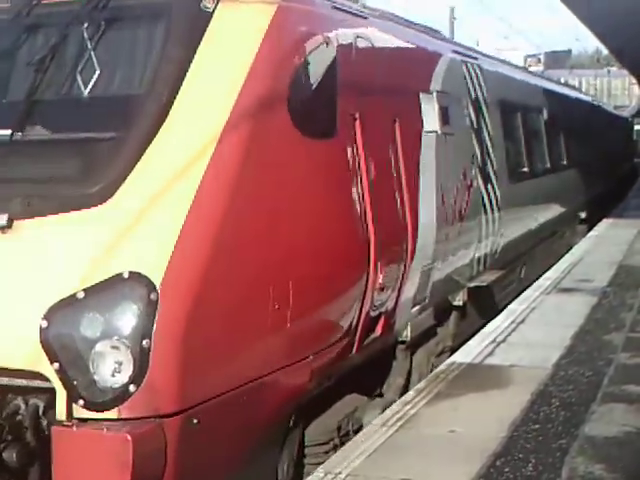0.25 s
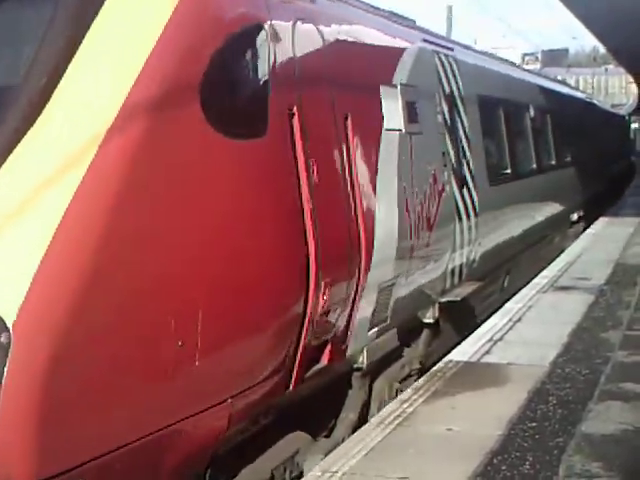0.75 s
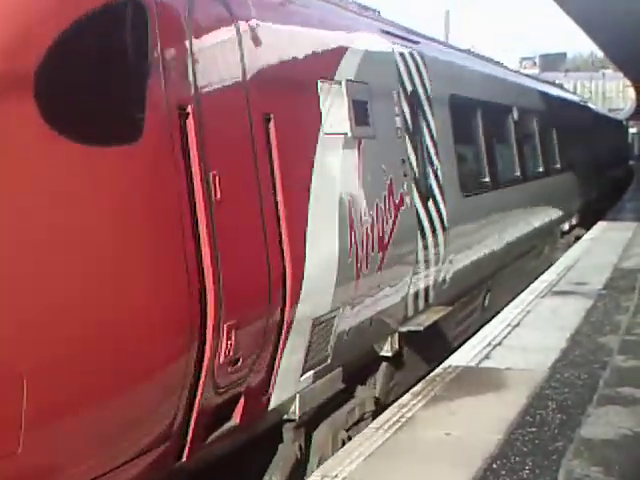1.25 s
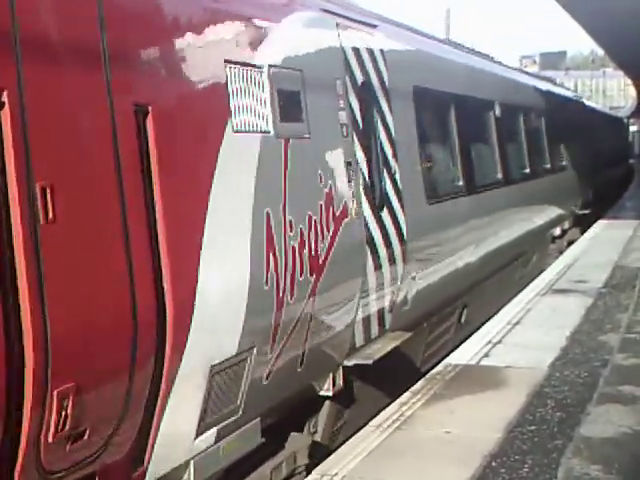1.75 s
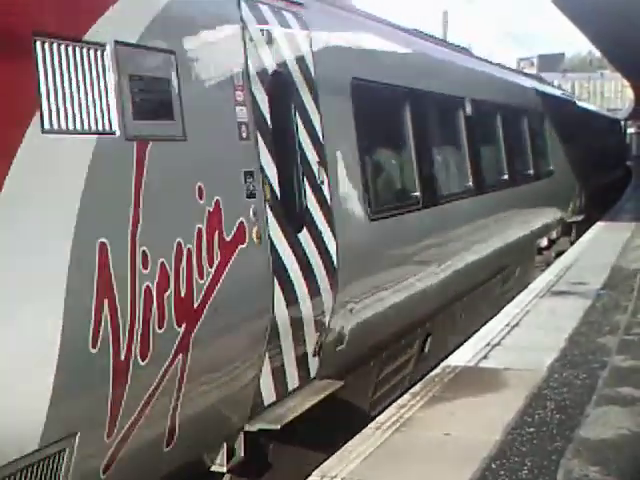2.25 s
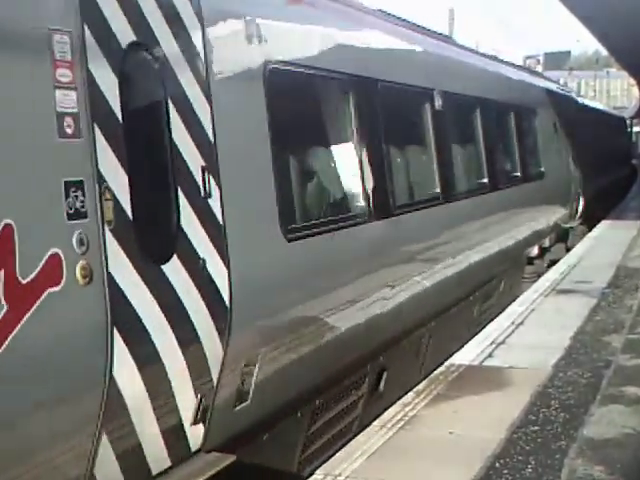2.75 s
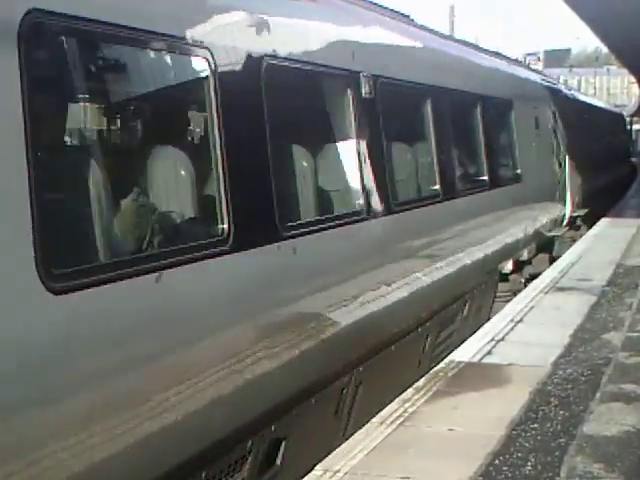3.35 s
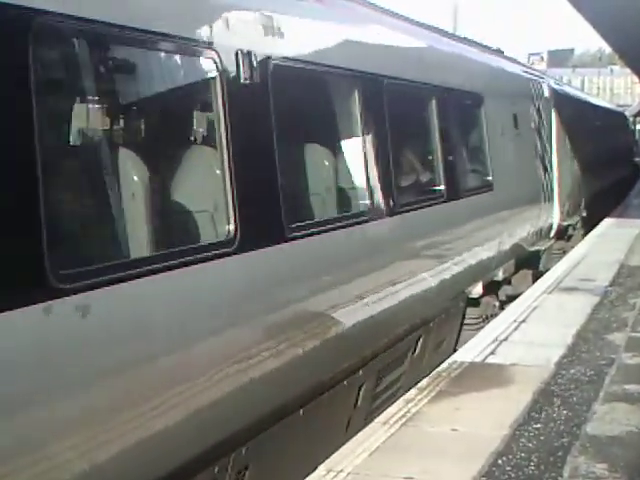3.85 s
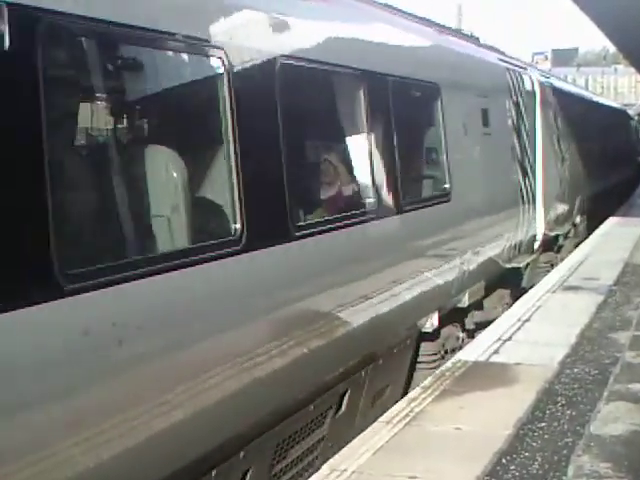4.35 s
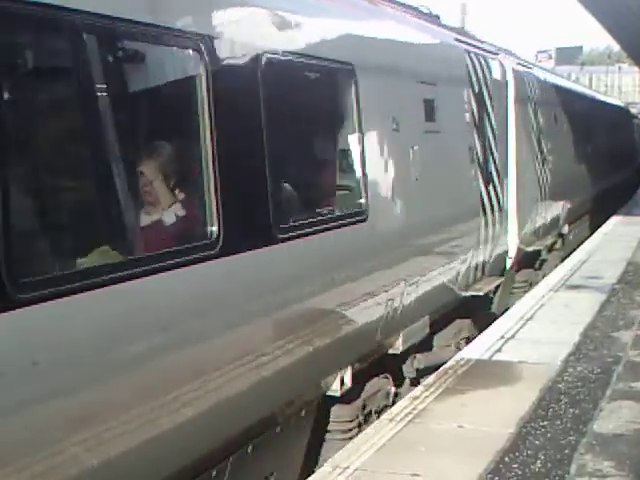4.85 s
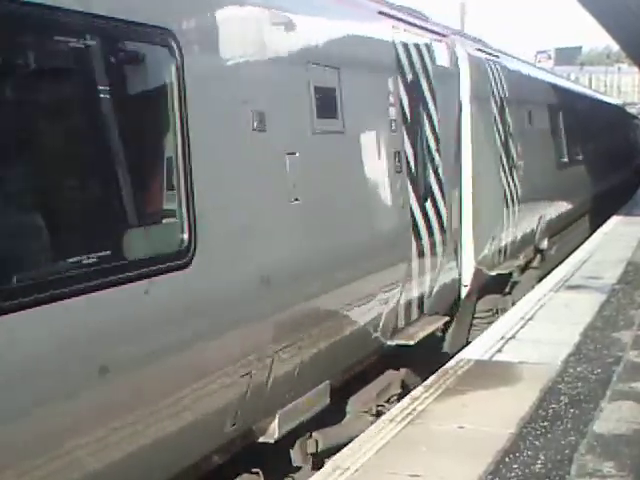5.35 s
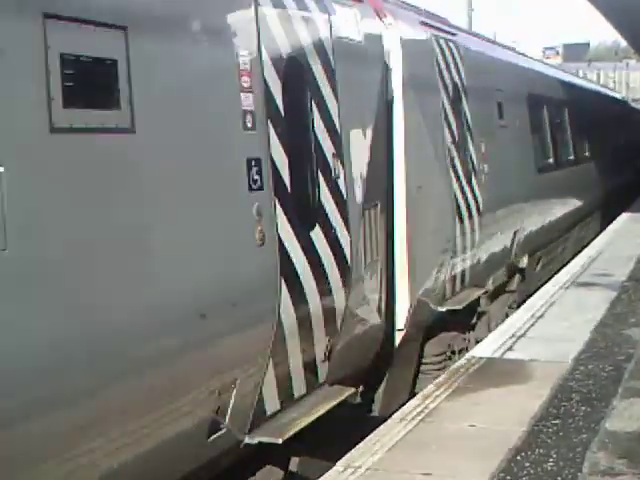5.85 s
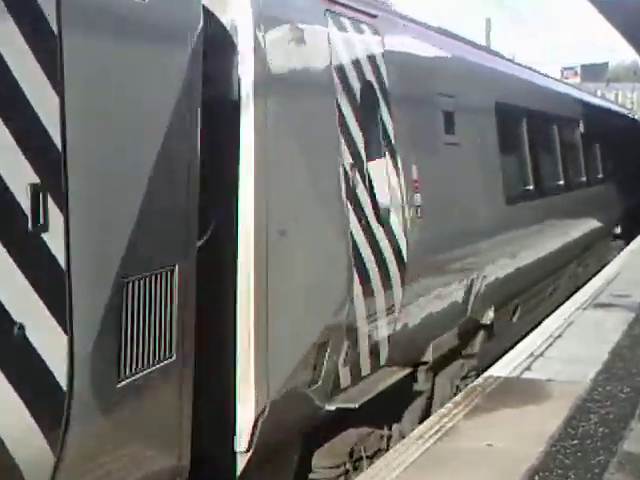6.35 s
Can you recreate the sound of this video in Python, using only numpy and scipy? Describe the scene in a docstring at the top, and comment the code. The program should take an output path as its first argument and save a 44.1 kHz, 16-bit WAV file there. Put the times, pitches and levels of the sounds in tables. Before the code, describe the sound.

A diesel train gathers speed past a small microphone on a station platform. From 0 s a low, steady drone throbs with rapid firing pulses, backed by soft rumble and muffled clatter; its pitch climbs smoothly by about a quarter over the whole stretch. From about 2 s the drone's tones beat and waver, and around 2.5 s and 3.5 s faint airy hisses and thin high singing slip by. Near 4.3 s clatter, gas noise and fan air swell. Between 4.8 and 5.5 s one engine passes very close: a throaty, pulsing roar with a hollow ring, heavy wheel rumble, a strong rush of air and a fuzzy, rising turbo whistle. A short gear whine surfaces around 6 s as the roar and hiss fall away. The drone remains full and buzzing, slightly higher, until an abrupt end at about 6.6 s.

```python
"""A droning diesel train gathers speed along a platform; after five seconds one engine passes close by.
The drone is a sum of crank orders lifted by pipe resonances, with pulsed gas noise; the clatter and
the low rumble are filtered noise. The close engine adds a pulsing roar, bay ring and gear tones;
filtered noise gives the cooling air, narrow noise the singing ducts and a climbing turbo whistle.
All firing and gear sounds follow one crank; sources going by swell and fade as 1 / distance."""
import sys
import numpy as np
from scipy import signal
from scipy.fft import rfft, irfft, next_fast_len
from scipy.io import wavfile

SR = 44100
rng = np.random.default_rng(int(sys.argv[2]) if len(sys.argv) > 2 else 0)


def store_wav(level_fs):
    """Save 16-bit WAV to argv[1]."""
    pcm = np.round(np.clip(np.atleast_2d(level_fs), -1, 1) * 32767)
    wavfile.write(sys.argv[1], SR, pcm.T.astype(np.int16))


N = 290619
T = np.arange(N) / SR  # s


def amp(db):
    """Decibels to gain."""
    return 10 ** (np.asarray(db) / 20)


def unit(x):
    """Scales to rms 1."""
    return x / np.sqrt(np.mean(x ** 2) + 1e-20)


def gain_at(colour, hz):
    """Gain of a spectrum at the given frequencies, interpolated in dB over log frequency."""
    f_hz, level_db = np.transpose(colour)
    return amp(np.interp(np.log(hz + 1), np.log(f_hz), level_db))  # + 1 avoids log(0)


def coloured(x, colour):
    """Filters by a spectrum; rms 1."""
    size = next_fast_len(N)
    gain = gain_at(colour, np.fft.rfftfreq(size, 1 / SR))
    return unit(irfft(rfft(x, size) * gain, size)[:N])


def waver(rate_hz):
    """Random signal of rms 1, low-passed by a Gaussian at about the given rate."""
    size = next_fast_len(N)
    lowpass = np.exp(-.5 * (np.fft.rfftfreq(size, 1 / SR) / rate_hz) ** 2)
    return unit(irfft(rfft(rng.standard_normal(size)) * lowpass, size)[:N])


def whistle(hz, width_hz):
    """Narrow noise of rms 1 that follows a pitch."""
    angle_rad = 2 * np.pi * np.cumsum(hz * np.ones(N)) / SR
    return unit(waver(width_hz) * np.cos(angle_rad) + waver(width_hz) * np.sin(angle_rad))


def passing(closest_s, approach_s, leave_s):
    """Gain of a source that goes by: 1 when closest, then falling as 1 / distance."""
    away = (T - closest_s) / np.where(T < closest_s, approach_s, leave_s)
    return 1 / np.sqrt(1 + away ** 2)


def loudness(places, far_db=-np.inf):
    """Gain of a sound from several passing places: powers add to the steady level from the train."""
    power = amp(far_db) ** 2
    for closest_s, level_db, approach_s, leave_s in places:
        power = power + (amp(level_db) * passing(closest_s, approach_s, leave_s)) ** 2
    return np.sqrt(power)


def crank_hz():
    """Crankshaft speed, rising as the train gathers speed."""
    # crank speed: t/s, speed/turns per s
    crank_speed = [(0, 23.07), (.5, 23.75), (2, 25.28), (2.5, 26.02), (3.5, 27.26), (4.5, 28.34),
                   (5.5, 29.02), (6, 29.17), (6.6, 29.52)]
    t_s, turns_per_s = np.transpose(crank_speed)
    return np.interp(T, t_s, turns_per_s)


def crank_turns(wobble_turns=0.0051):
    """Crank angle in turns, slightly unsteady."""
    return np.cumsum(crank_hz()) / SR + wobble_turns * waver(rate_hz=6.5)


def tone(turns, order, start_turns=0):
    """A sine of rms 1 locked to the crank; a four-stroke cycle allows whole and half orders."""
    return np.sqrt(2) * np.cos(2 * np.pi * (order * turns + start_turns))


def side_tones(turns, orders, fading_db):
    """Weak engine orders that come and go with the reflections off the platform."""
    total = 0
    for order, level_db in orders:
        fading = amp(level_db + fading_db * waver(rate_hz=3.1))
        total = total + fading * tone(turns, order, rng.random())
    return total


def knocks(turns, decay, unequal_db, chance_db):
    """A burst at each firing, decay in firing intervals; the cylinders differ, and so does each stroke."""
    cylinders = 6
    firings = (turns - turns.min()) * cylinders / 2  # each cylinder fires every two turns
    stroke = firings.astype(int)
    cylinder_db = unequal_db * unit(rng.standard_normal(cylinders))
    stroke_db = chance_db * rng.standard_normal(N)
    strength = amp(cylinder_db[stroke % cylinders] + stroke_db[stroke])
    return unit(strength * np.exp(-(firings % 1) / decay))


def cyclic_noise(turns, repeating):
    """Noise of which a share (of power, 0-1) repeats with every two turns of the crank."""
    cycle = rng.standard_normal(3072)
    locked = np.interp(turns / 2 % 1, np.linspace(0, 1, len(cycle)), cycle)
    return np.sqrt(repeating) * locked + np.sqrt(1 - repeating) * rng.standard_normal(N)


def rumble():
    """Low noise of rolling wheels and the shaking underframe."""
    # spectrum: f/Hz, relative level/dB
    rumble_colour = [(10, 13.5), (25, -10.5), (38, 5.5), (50, 15.5), (64, 11), (100, 6.5), (170, 9),
                     (400, -42.5)]
    # wheels going by: closest/s, level/dB, approach/s, leaving/s
    wheel_pass = [(5.15, -27.5, 0.23, 0.58)]
    return loudness(wheel_pass, far_db=-39) * coloured(rng.standard_normal(N), rumble_colour)


def clatter(turns, pulsing=0.087):
    """Combustion and injector noise from along the train, ringing in the engine casings."""
    # casing spectrum: f/Hz, relative level/dB
    clatter_colour = [(200, -1.5), (540, -4.5), (850, 6), (1080, 1), (1250, -9), (1480, -1.5), (1620, 3.5),
                      (1740, 3.5), (1840, -6.5), (2350, -16), (2800, -10), (3300, -19), (3900, -41.5),
                      (9500, -56)]
    # casings going by: closest/s, level/dB, approach/s, leaving/s
    casing_pass = [(2.35, -50.5, 0.2, .25), (4.3, -42.5, .25, 0.48)]
    beat = 1 - pulsing + pulsing * knocks(turns, decay=0.27, unequal_db=5, chance_db=4.5)
    return loudness(casing_pass, far_db=-46.5) * coloured(beat * rng.standard_normal(N), clatter_colour)


def duct_whistle(hz=5430, width_hz=50, far_db=-78):
    """One duct sings at a steady pitch all along the train."""
    # duct openings going by: closest/s, level/dB, approach/s, leaving/s
    duct_pass = [(2.5, -76.5, 0.12, 0.23), (3.35, -72.5, 0.42, 0.19)]
    return loudness(duct_pass, far_db) * whistle(hz, width_hz)


def cooling_air(rush_db=9, gust_db=0.9):
    """Air rushing through the coolers and grilles (broad noise), and singing in the ducts (narrow)."""
    # rush spectrum: f/Hz, relative level/dB
    air_colour = [(900, -3), (1700, 17), (2100, 18), (2800, 19), (3100, 10.5), (3450, 15), (3800, 2.5),
                  (4300, 9), (4600, 0), (6400, 4), (7400, 3), (8600, 6), (10000, 3), (11800, -19)]
    # singing ducts: f/Hz, width/Hz, level/dB re flow gain
    ducts = [(2740, 28, -1), (5320, 310, -6), (6750, 190, -10)]
    # flow gain of grilles going by: closest/s, level/dB, approach/s, leaving/s
    grille_pass = [(2.5, -71, 0.41, 0.095), (4.35, -63.5, .2, 0.36), (5.16, -58, 0.81, 0.31),
                   (6.57, -71, 0.056, 0.14)]
    flow = loudness(grille_pass, far_db=-82) * amp(gust_db * waver(rate_hz=25))
    rush = amp(rush_db) * coloured(rng.standard_normal(N), air_colour)
    singing = sum(amp(level_db) * whistle(hz, width_hz) for hz, width_hz, level_db in ducts)
    return flow * (rush + singing)


def turbo(start_hz=3980, rise_hz_per_s=424, core_db=-5.5, skirt_db=0):
    """A fuzzy whistle that rises steadily as the turbocharger spools up."""
    # gain before core, skirt and spool factors: closest/s, level/dB, approach/s, leaving/s
    turbo_pass = [(3.55, -67, 0.17, 0.33), (5.22, -56, 0.27, 0.3)]
    hz = start_hz + rise_hz_per_s * T
    core = amp(core_db) * whistle(hz, width_hz=45)
    skirt = amp(skirt_db) * whistle(hz, width_hz=170)
    spooled = (hz / hz[-1]) ** 2  # the faster it spins, the louder it sings
    return spooled * loudness(turbo_pass) * (core + skirt)


def engine_roar(turns, beat, roar_db=-3):
    """The close engine's roar: noise pulsing with the firing, plus weaker crank orders."""
    # roar spectrum: f/Hz, relative level/dB
    roar_colour = [(100, -29), (250, -4), (480, -4), (650, 2.5), (1080, -4), (1350, -10), (1700, -3.5),
                   (2000, -21.5), (2800, -20), (4000, -24.5), (8000, -53)]
    # weaker tones: crank order, level/dB re engine gain
    near_orders = [(1.5, -12), (2, -10), (4, -11), (4.5, -10.5), (6.5, -3), (7.5, -8.5), (11, -11),
                   (13, -12.5)]
    # engine gain: closest/s, level/dB, approach/s, leaving/s
    engine_pass = [(5.2, -34.5, 0.47, .62)]
    roar = amp(roar_db) * coloured(beat * cyclic_noise(turns, repeating=0.43), roar_colour)
    return loudness(engine_pass) * (roar + side_tones(turns, near_orders, fading_db=1))


def bay_ring(turns, beat):
    """Throaty ring of the engine bay: pulsing noise through its resonances."""
    # bay spectrum: f/Hz, relative level/dB
    bay_colour = [(300, -12.5), (370, -2), (440, 12), (490, 6.5), (570, 5.5), (630, -26.5), (900, -23.5),
                  (1080, 3.5), (1300, -33), (2000, -37)]
    # bays going by: closest/s, level/dB, approach/s, leaving/s
    bay_pass = [(3.7, -51.5, 0.35, .2), (5.02, -33, 0.29, 0.3)]
    return loudness(bay_pass) * coloured(beat * cyclic_noise(turns, repeating=0.56), bay_colour)


def gear_tones():
    """Gears whine at fixed multiples of crank speed."""
    # gears: crank order, level/dB re gear gain
    gears = [(37.5, -6), (42, -3), (56, -8)]
    # gear gain: closest/s, level/dB, approach/s, leaving/s
    gear_pass = [(5.0, -47, 0.069, 0.16), (5.98, -46, .15, 0.19)]
    whine = sum(amp(level_db) * whistle(order * crank_hz(), width_hz=6) for order, level_db in gears)
    return loudness(gear_pass) * whine


def close_engine(turns):
    """The engine under the coach: roar and bay share one firing beat; gears whine on top."""
    beat = .83 + .17 * knocks(turns, decay=1, unequal_db=2, chance_db=.5)
    return engine_roar(turns, beat) + bay_ring(turns, beat) + gear_tones()


def pipe_gain(order):
    """Exhaust resonances: a crank order swells as rising speed carries it through one."""
    # resonances: f/Hz, width/Hz, peak gain added to 1/dB
    pipe_modes = [(73.74, 4.2, 9.5), (143.16, 10.5, 14.5), (156.56, 5.9, 22), (163.55, 3.6, 16),
                  (202.6, 13.7, 25), (233.7, 1.7, -2), (318.8, 7.9, 2)]
    hz = order * crank_hz()
    lift = 0
    for mode_hz, width_hz, peak_db in pipe_modes:
        lift = lift + amp(peak_db) / (1 + (2 * (hz - mode_hz) / width_hz) ** 2)
    return 1 + lift


def far_tones(turns):
    """The weaker orders leave by the same resonant pipe."""
    # tones from afar: crank order, level before pipe gain/dB
    far_orders = [(1, -47.5), (1.5, -47), (2, -51), (4.5, -71.5), (11, -56.5), (12, -58), (13, -56.5),
                  (14, -58)]
    total = 0
    for order, level_db in far_orders:
        total = total + pipe_gain(order) * side_tones(turns, [(order, level_db)], fading_db=4)
    return total


def exhaust_noise(turns, pulsing=0.2):
    """Each cylinder's puff carries a burst of turbulent gas."""
    # gas spectrum: f/Hz, relative level/dB
    blast_colour = [(70, -28), (125, -9.5), (170, -6.5), (230, 7), (300, -1), (390, -0.5), (450, -12.5),
                    (540, -41.5), (900, -50)]
    # outlets going by: closest/s, level/dB, approach/s, leaving/s
    gas_pass = [(4.25, -33.5, 0.21, 0.21), (5.15, -32.5, 0.15, 0.19)]
    beat = 1 - pulsing + pulsing * knocks(turns, decay=0.15, unequal_db=1, chance_db=8)
    gas = cyclic_noise(turns, repeating=.2)
    return loudness(gas_pass, far_db=-43) * coloured(beat * gas, blast_colour)


def exhaust_level(order, far_db, near_db, loudest_s, approach_s):
    """Gain of one exhaust tone: lifted by the pipe's resonances, and by the outlet coming close."""
    near = amp(near_db) * passing(loudest_s, approach_s, approach_s)
    return pipe_gain(order) * np.hypot(amp(far_db), near)


def beating(depth, dip_s, period_s, from_s=1.6, grow_s=.3):
    """A tone dips and returns at even intervals once the train is under way."""
    grown = np.clip((T - from_s) / grow_s, 0, 1)
    return np.sqrt(1 - depth * grown * np.cos(np.pi * (T - dip_s) / period_s) ** 2)


def exhaust(turns, smear_turns=.0085, drift_turns=0.067):
    """The drone: cylinder puffs give the firing orders (multiples of 3); unequal cylinders the others."""
    # crank order, far and near level before pipe gain and beat/dB, loudest/s, approach and leaving/s,
    # beat depth/0-1, dip/s, dip period/s
    exhaust_tones = [(3, -36.5, -27, 5.53, 0.77, 0.95, 2.76, 1.7), (4, -61.5, -36.5, 9.2, 0.27, 0.12, 3, 2),
                     (5, -66.5, -39.5, 5.8, 0.47, 1, 5.56, 3.5),
                     (6, -45.5, -35.5, 5.5, 0.48, 0.6, 2.26, 1.41), (7, -77.5, -55, 6.3, 0.9, 1, 2.4, 2.1),
                     (8, -54, -37, 6.6, 0.15, 0.93, 3.0, 1.1),
                     (9, -49.5, -27.5, 5.59, 0.41, 0.92, 3.627, 2.24),
                     (10, -47.5, -40, 6, .12, 0.5, 2.98, 1.8)]
    puffs = 0
    for order, far_db, near_db, loudest_s, approach_s, depth, dip_s, period_s in exhaust_tones:
        # the silencer delays high orders more than low ones; shifting echoes let each drift a little
        lag_turns = smear_turns * order ** 2 + drift_turns * waver(rate_hz=0.72)
        gain = exhaust_level(order, far_db, near_db, loudest_s, approach_s)
        puffs = puffs + gain * beating(depth, dip_s, period_s) * tone(turns, order, -lag_turns)
    flutter = 1 + .08 * waver(rate_hz=25)
    return puffs * flutter


def scene():
    """Mixes all layers; firing and gears follow one crank."""
    turns = crank_turns()
    air = cooling_air() + duct_whistle() + turbo()
    drone = exhaust(turns) + exhaust_noise(turns) + far_tones(turns)
    return (rumble() + clatter(turns) + air + close_engine(turns) + drone)[None]


def record(dry):
    """A small microphone: the top rolls off, then ends steeply; the ends are faded."""
    soft = signal.firwin(25, 10650, fs=SR)
    steep = signal.firwin(511, 12000, window=("kaiser", 9), fs=SR)
    ends = signal.windows.tukey(N, .001)
    return signal.oaconvolve(dry * ends, np.convolve(soft, steep)[None], "same")


dry = scene()
out = record(dry)
store_wav(out)
```